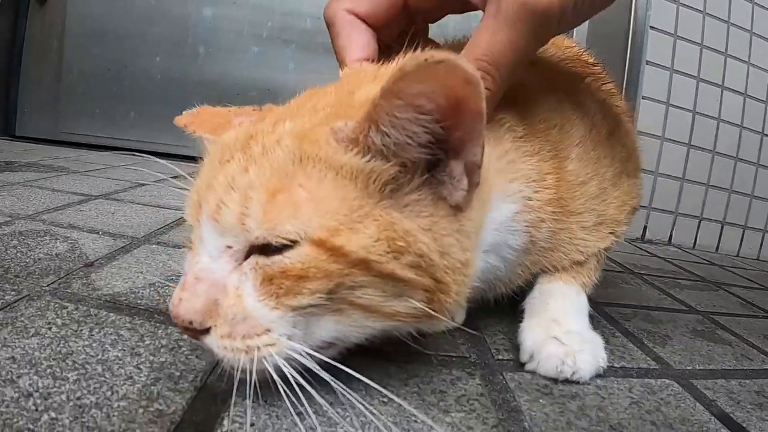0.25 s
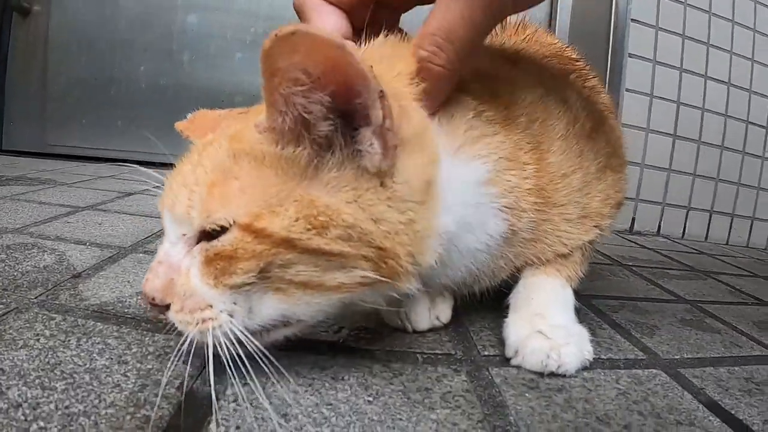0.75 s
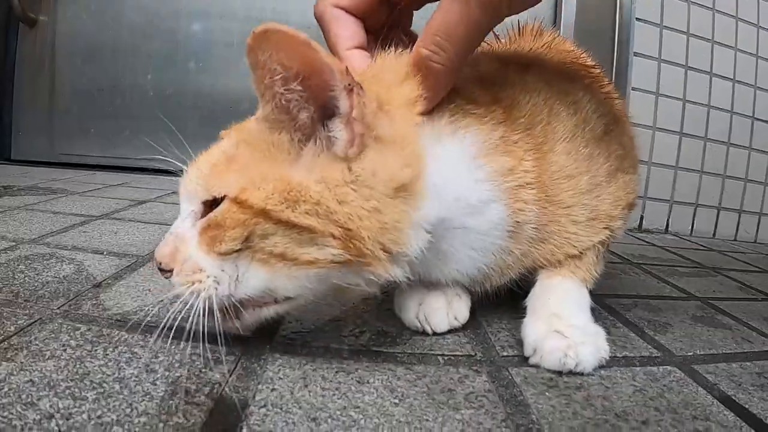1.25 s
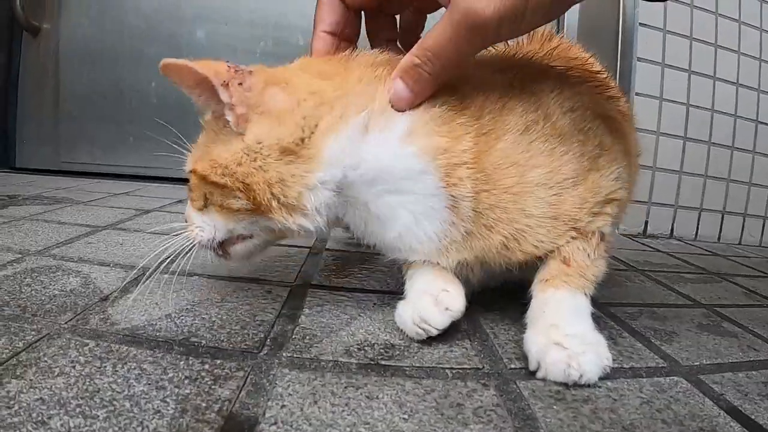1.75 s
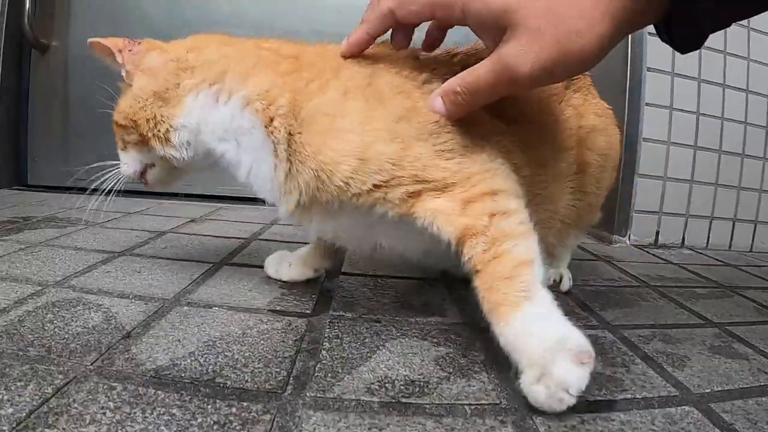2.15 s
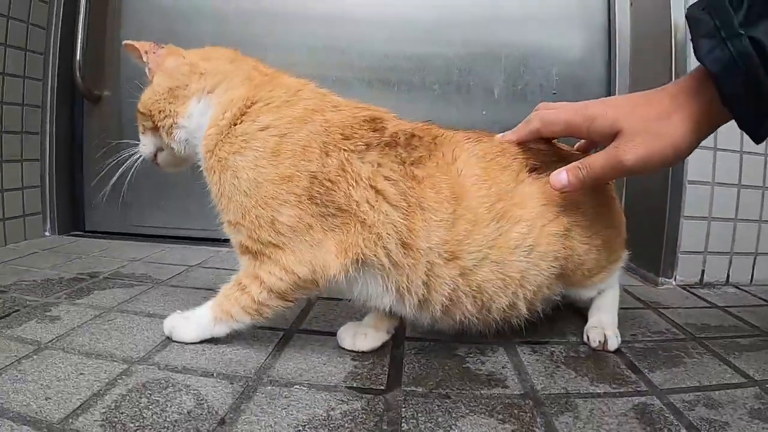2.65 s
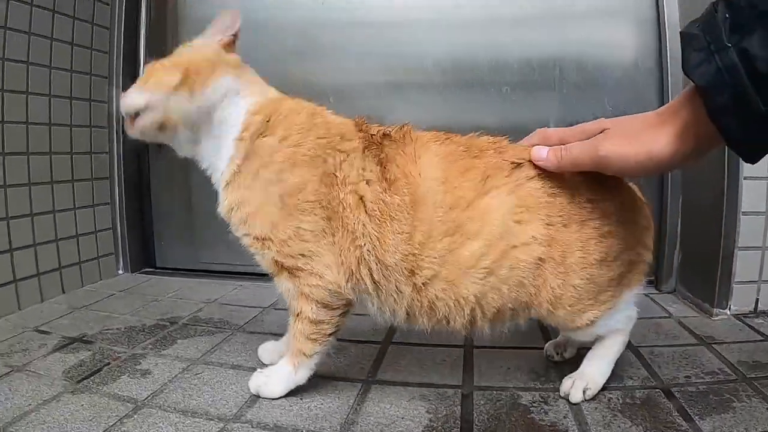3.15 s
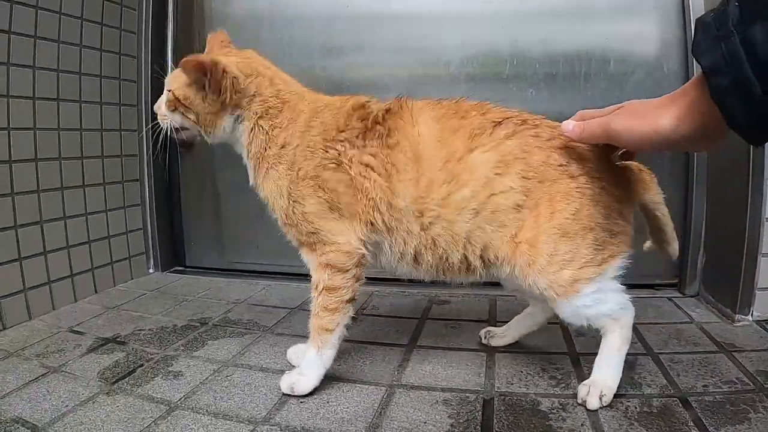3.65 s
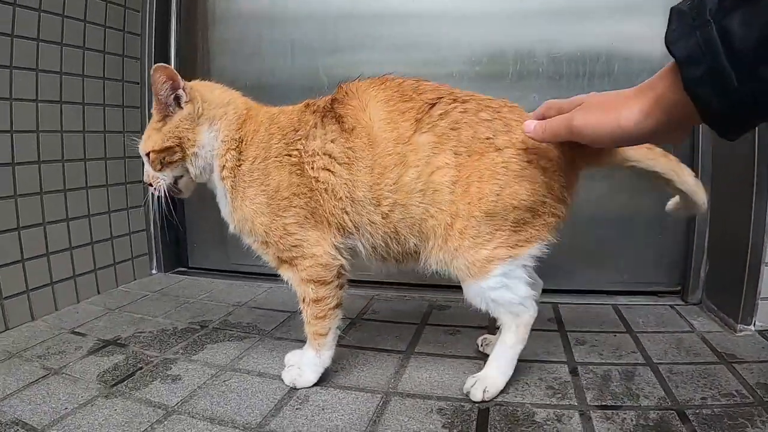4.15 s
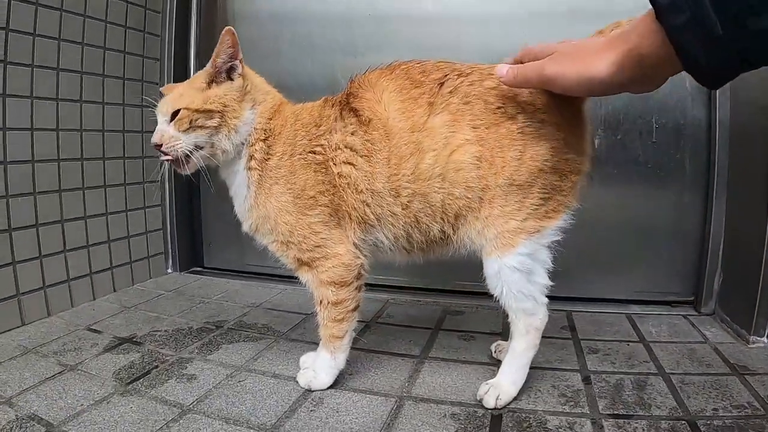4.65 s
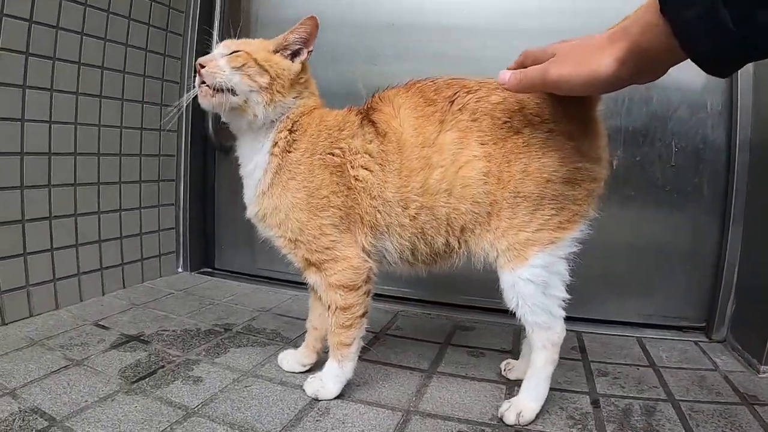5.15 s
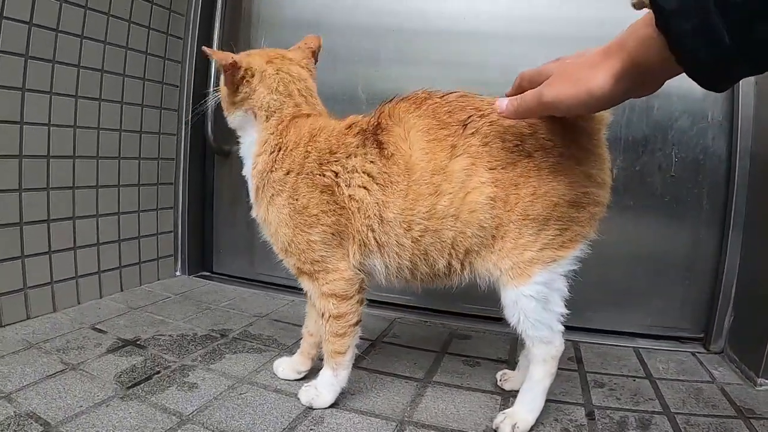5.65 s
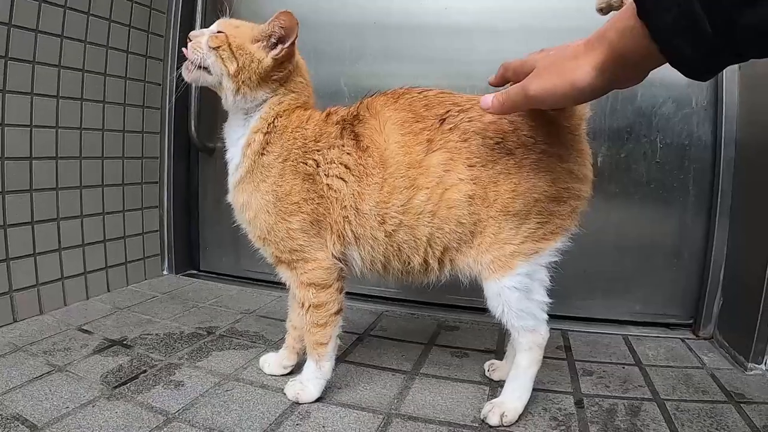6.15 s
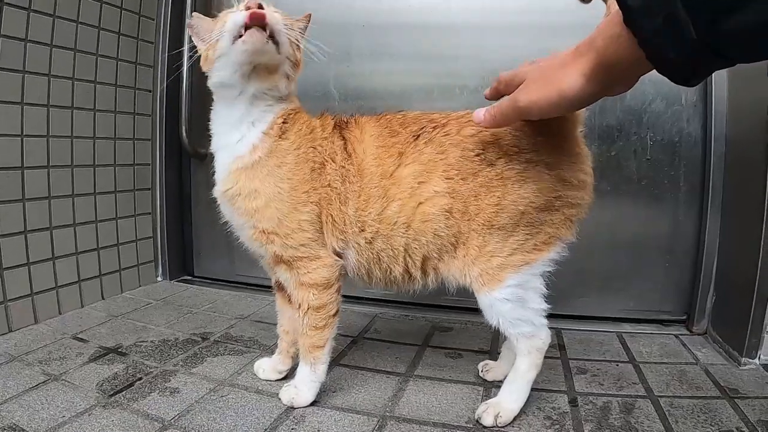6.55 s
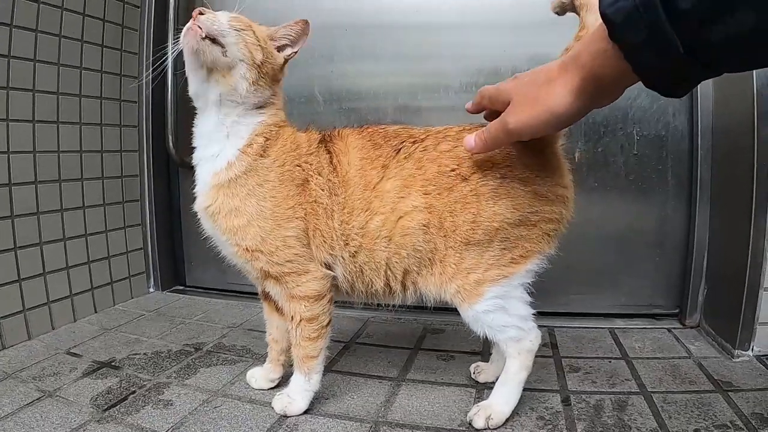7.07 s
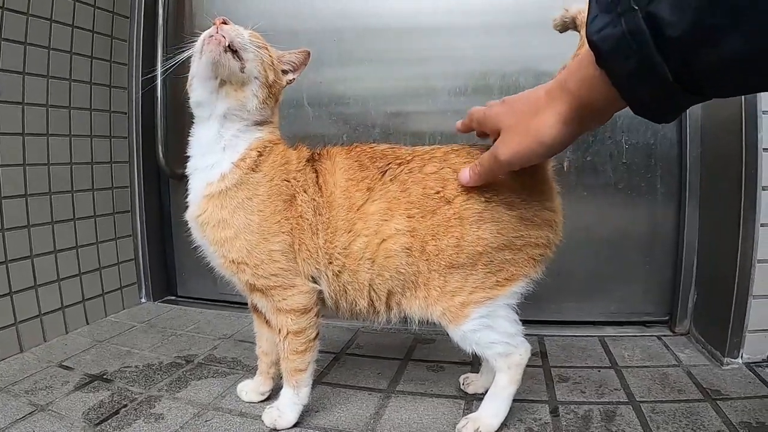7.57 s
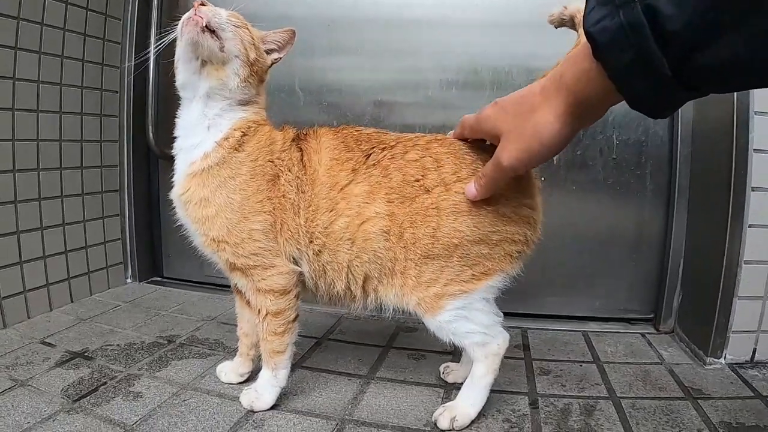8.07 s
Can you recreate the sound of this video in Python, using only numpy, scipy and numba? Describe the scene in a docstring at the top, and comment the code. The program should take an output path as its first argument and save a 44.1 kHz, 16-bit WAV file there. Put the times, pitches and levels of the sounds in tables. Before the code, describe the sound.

A cat gives three hoarse, squeaky high mews in a tiled porch, over steady rain and low town rumble, with soft bumps and clicks.

```python
"""A cat with a hoarse, squeaky voice mews three times in a tiled porch: wavering harmonic lines with
half-multiples, roughened by a rasp and mixed with air noise. Rain falls outside as coloured noise with single
ringing drops, over a deep town rumble of low noise. Jacket sleeve and fur rustle as short band noise, the
small camera takes soft bumps, and drips and claws click on the tiles, both as damped modes."""
import sys
import numpy as np
from scipy import signal
from scipy.fft import rfft, irfft
from scipy.io import wavfile
from scipy.ndimage import uniform_filter1d
from numba import njit

SR = 44100
rng = np.random.default_rng(int(sys.argv[2]) if len(sys.argv) > 2 else 0)


def generate_wav(sig):
    """Save sig (samples, or channels by samples) to the path in sys.argv[1] as 16-bit PCM at SR."""
    pcm = np.round(np.clip(np.atleast_2d(sig).T, -1, 1) * 32767).astype(np.int16)
    wavfile.write(sys.argv[1], SR, pcm)


N = 366471
T = np.arange(N) / SR  # s
F = np.maximum(np.arange(N // 2 + 1) * SR / N, 1)  # Hz, one per FFT bin


def undb(db):
    """Logarithmic level: amplitude gain of a level in dB."""
    return 10 ** (np.asarray(db) / 20)


def unit(x):
    """Normalisation: scaled to rms 1."""
    return x / np.sqrt(np.mean(x ** 2))


def on_axis(table):
    """Spectral interpolation: a (Hz, value) table read at every FFT bin, straight on log frequency."""
    hz, value = np.transpose(table)
    return np.interp(np.log(F), np.log(hz), value)


def pan(x, db):
    """Level difference between channels: the left is db above the right."""
    return x * undb(np.array([[db / 2], [-db / 2]]))


def walk(rate, count=N):
    """Random modulation: levels held for 1 / rate s and slewed twice; spread near 1."""
    hold = max(int(SR / rate), 1)
    steps = np.repeat(rng.standard_normal(count // hold + 1), hold)
    return 1.313 * uniform_filter1d(uniform_filter1d(steps, hold), hold)[:count]


@njit
def moving_bandpass(x, hz, width):
    """Resonance: a state-variable band-pass with a moving centre, gain 1 there."""
    y, band_state, low_state = np.empty(len(x)), 0., 0.
    for i in range(len(x)):
        g, damping = np.tan(np.pi * hz[i] / SR), width / hz[i]
        v = (band_state + g * (x[i] - low_state)) / (1 + g * (g + damping))
        band_state = 2 * v - band_state
        low_state += 2 * g * v
        y[i] = damping * v
    return y


def band(x, hz, width):
    """Cascaded resonance: passed twice, steep on both sides; rms 1."""
    centre = hz + 0 * x
    once = moving_bandpass(x, centre, 1. * width)
    return unit(moving_bandpass(once, centre, 1. * width))


@njit
def rings(start, hz, t60, left, right):
    """Free vibration: a damped sine for each blow, cut off after falling 60 dB."""
    out = np.zeros((2, N))
    for k in range(len(start)):
        step = np.exp(2j * np.pi * hz[k] / SR - np.log(1000) / (t60[k] * SR))
        z = 1 + 0j
        for i in range(int(start[k] * SR), min(N, int((start[k] + t60[k]) * SR))):
            out[0, i] += left[k] * z.imag
            out[1, i] += right[k] * z.imag
            z *= step
    return out


# Stereo width of the weather. Each row: frequency in Hz, side minus mid level in dB.
SIDE_LEVEL = [(60, -22), (110, -16.5), (170, -14), (300, -14), (1240, -5), (4180, -2.5), (9000, -1)]
# Level difference of the two ports. Each row: frequency in Hz, left minus right in dB.
PORT_LEAN = [(300, 0.55), (680, 1), (1240, 4), (4180, 5), (8000, 0)]
# Phase difference of the two ports. Each row: frequency in Hz, phase by which the left leads in radians.
PORT_PHASE = [(300, 0), (1200, -.5), (3000, -1), (5000, 1.5), (7000, 2), (9000, 3.5)]


def wash(spectrum, swell_db, flicker_db):
    """Diffuse field: stereo noise in half-octave bands that swell together and flicker alone."""
    shape = undb(on_axis(spectrum)) * (F < spectrum[-1][0])
    swell = walk(0.62)
    mid, side = rfft(rng.standard_normal((2, N)))
    side = side * undb(on_axis(SIDE_LEVEL))
    lean = undb(on_axis(PORT_LEAN) / 2) * np.exp(.5j * on_axis(PORT_PHASE))
    pair = shape * np.array([(mid + side) * lean, (mid - side) / lean])
    octave = np.log2(F)
    lowest, highest = np.log2(spectrum[0][0]), np.log2(spectrum[-1][0])
    out = 0
    for centre in np.arange(np.floor(lowest), highest + .5, .5):
        slot = np.clip(1 - 2 * np.abs(octave - centre), 0, 1)  # neighbours overlap and sum to 1
        out = out + undb(swell_db * swell + flicker_db * walk(9)) * irfft(pair * slot, N)
    return unit(out)


# Colour of the town rumble. Each row: frequency in Hz, relative density in dB per Hz.
RUMBLE_COLOUR = [(8.8, -48), (15, -16), (25, -9), (33, 1.5), (48, 1), (103, -16.5), (135, -28.5),
                 (174, -21), (196, -29.5), (222, -24), (248, -32), (280, -27), (320, -35.5), (368, -41.5),
                 (400, -36), (520, -55), (880, -120)]
# Chance level fluctuations of the low noise, below about 130 Hz.
# Each row: middle in seconds, level change in dB.
NOISE_LEVEL_MARKS = [(0, -4.5), (1.81, -8.5), (3.555, -6), (4.12, -6.5), (4.47, 5), (5.13, -11),
                     (6.69, -11), (8.2, -4.5)]
RUMBLE_DB = -26.5
MARK_S, MARK_TOP_HZ = 0.051, 130  # the fluctuations touch only the deepest part


def rumble():
    """Low-pass noise: a deep town rumble whose bottom fluctuates by chance."""
    steady = wash(RUMBLE_COLOUR, swell_db=0.51, flicker_db=2.65)
    level = undb(sum(db * np.exp(-((T - s) / MARK_S) ** 2) for s, db in NOISE_LEVEL_MARKS))
    deep = irfft(rfft(steady) / (1 + (F / MARK_TOP_HZ) ** 4), N)
    return undb(RUMBLE_DB) * (steady + (level - 1) * deep)


# Colour of the rain. Each row: frequency in Hz, relative density in dB per Hz.
RAIN_COLOUR = [(150, -33), (260, -5.5), (400, -12.5), (530, -10.5), (800, -15.5), (1050, -10.5),
               (2000, -13), (5400, -18), (6800, -21), (8500, -31.5), (12400, -43.5), (14500, -56)]
DROPS_PER_S, DROP_SCATTER_DB = 400, 3
DROP_DB = -11.5  # against the hiss of the rain
RAIN_DB, RAIN_DB_PER_S = -42.5, -0.2  # it eases slowly


def drops():
    """Random impacts: single drops ring briefly, scattered in pitch, size and side."""
    when, pitch, rarity, side = rng.random((int(DROPS_PER_S * N / SR), 4)).T
    hz = 700 * 2 ** (3.8 * pitch)
    size = undb(-DROP_SCATTER_DB * np.log(1 - .998 * rarity))  # few are large
    patter = rings(when * N / SR, hz, 12.5 / hz, size * np.sqrt(side), size * np.sqrt(1 - side))
    white = rfft(patter) * np.sqrt(F)  # small drops as loud per Hz as large ones before colouring
    return unit(irfft(white * undb(on_axis(RAIN_COLOUR)), N))


def rain():
    """Superposition: innumerable drops merge into nearly steady noise, with single ones standing out."""
    hiss = wash(RAIN_COLOUR, swell_db=.3, flicker_db=1.6)
    return undb(RAIN_DB + RAIN_DB_PER_S * T) * (hiss + undb(DROP_DB) * drops())


def sounding(table):
    """Piecewise interpolation: the samples a table spans, its columns there, and a soft-ended gate."""
    s, *columns = np.transpose(table)
    span = slice(int(s[0] * SR), int(s[-1] * SR))
    t = T[span]
    gate = np.clip(np.minimum(t - s[0], s[-1] - t) / 0.022, 0, 1)
    return span, [np.interp(t, s, c) for c in columns], gate


RASP_HZ = 259  # mean; it wanders


def whistle(hz, lines, rough):
    """Amplitude modulation: a rasp splits the fluttering multiples of one wavering pitch into strands."""
    n = len(hz)
    waver = 1 + .005 * walk(60, n) + 0.0361 * rough * walk(500, n)
    phase = 2 * np.pi * np.cumsum(hz * waver) / SR
    rasp = 2 * np.pi * np.cumsum(RASP_HZ * (1 + .25 * walk(25, n))) / SR
    split = 1 + 1.24 * rough * np.sin(rasp)
    total = 0
    for multiple, db in lines:
        flutter_db = (2.5 + 1.4 * rough) * walk(89.94, n) + 1.8 * rough * walk(400, n)
        total = total + undb(db + flutter_db) * np.sin(multiple * phase)
    return np.sqrt(2) * split * total


# Thinner strands beside the squeak: mostly another part of the folds whistling on its own, but near 4300-4400
# Hz # in the last mew a fixed resonance that flares as the line passes. # Each row: start in seconds, length in
# seconds, first pitch in Hz, last pitch in Hz, top level in dB.
SIDE_STRANDS = [(0.619, 0.095, 5040, 5200, -49), (0.725, 0.125, 5270, 5230, -44),
                (0.683, 0.16, 1038, 1073, -55), (1.63, 0.06, 5150, 5700, -52), (1.67, .12, 5950, 6360, -50),
                (1.675, 0.11, 4330, 4680, -46), (1.829, 0.088, 4590, 4650, -36.5),
                (1.88, 0.12, 5300, 5340, -46.5), (1.983, 0.15, 5330, 5100, -43.5),
                (2.13, 0.26, 4950, 4950, -50.5), (1.962, 0.19, 3924, 3950, -50),
                (2.77, .09, 2660, 2450, -53), (2.772, 0.073, 4450, 4480, -51),
                (2.765, 0.08, 5080, 5000, -53), (5.299, 0.062, 5520, 5550, -50),
                (5.42, .07, 5200, 5050, -53), (5.781, 0.081, 4350, 4300, -35),
                (6.106, 0.05, 4340, 4296, -48), (6.219, 0.066, 4300, 4395, -40),
                (6.345, 0.1, 4400, 4370, -46)]
STRAND_ENDS_DB, STRAND_ROUGH = -5, 0.34  # a strand swells to its middle


def strands():
    """Independent oscillators and a flaring resonance: thin whistles glide straight beside the main squeak."""
    out = np.zeros(N)
    for s, length, first_hz, last_hz, db in SIDE_STRANDS:
        span, (hz, along), gate = sounding([(s, first_hz, -1), (s + length, last_hz, 1)])
        lines = [(1, db + STRAND_ENDS_DB * along ** 2)]
        out[span] += gate * whistle(hz, lines, STRAND_ROUGH)
    return out


# Pitch and level of the squeaks, one curve a squeak; the first mew breaks into two.
# Each row of a curve: time in seconds, pitch in Hz, level of the main line in dB.
SQUEAKS = [
    [(0.39, 3000, -56), (0.405, 3210, -47), (0.425, 3460, -36.5), (0.44, 3517, -31.5), (0.47, 3490, -44),
     (0.486, 3536, -33), (0.52, 3535, -34), (0.535, 3565, -40), (0.605, 3530, -48), (0.63, 3500, -54),
     (0.66, 3450, -62)],
    [(0.54, 3700, -47), (0.6, 3810, -46), (0.615, 3930, -46), (0.665, 4025, -42), (0.7, 4070, -53),
     (0.77, 4090, -52), (0.84, 4070, -55), (0.89, 4000, -62)],
    [(1.63, 3560, -63), (1.665, 3660, -46), (1.71, 4000, -45), (1.74, 4260, -38), (1.77, 4310, -47),
     (1.8, 4340, -37), (1.84, 4420, -44), (1.88, 4420, -52), (1.92, 4455, -41), (1.98, 4520, -47),
     (2.04, 4400, -41), (2.065, 4260, -51), (2.08, 4300, -39.5), (2.245, 4184, -39.5), (2.265, 4220, -55),
     (2.31, 4100, -28.5), (2.34, 4126, -43), (2.36, 4150, -42), (2.37, 4140, -35), (2.388, 4170, -41),
     (2.397, 4094, -32), (2.46, 3940, -33), (2.49, 4090, -35.5), (2.558, 4000, -34.5), (2.575, 4040, -50),
     (2.585, 3900, -31.5), (2.62, 3684, -32), (2.688, 3360, -40.5), (2.72, 3346, -34), (2.752, 3710, -40),
     (2.765, 3863, -32.5), (2.79, 3930, -36.5), (2.82, 3874, -43), (2.84, 3760, -36.5), (2.9, 3880, -56),
     (2.95, 3880, -60)],
    [(5.18, 4200, -65), (5.21, 4260, -50), (5.27, 4270, -40), (5.3, 4540, -43), (5.352, 4540, -38),
     (5.415, 4390, -50), (5.435, 4524, -45), (5.49, 4370, -43), (5.52, 4220, -31.5), (5.535, 4260, -40),
     (5.565, 4057, -37), (5.65, 4193, -40), (5.71, 4335, -37.5), (5.74, 4534, -41), (5.755, 4680, -43),
     (5.79, 4346, -34.5), (5.83, 4110, -33), (5.865, 3820, -31), (5.898, 3726, -30), (5.925, 3770, -45),
     (5.94, 4020, -31), (5.976, 4280, -33.5), (6.02, 4630, -41), (6.055, 4830, -40), (6.08, 5020, -41),
     (6.098, 4880, -39), (6.12, 4400, -38), (6.135, 4300, -34), (6.185, 3812, -37.5), (6.245, 4070, -39.5),
     (6.275, 4374, -46), (6.3, 4430, -39), (6.32, 4600, -41), (6.345, 4640, -41), (6.376, 4240, -35),
     (6.4, 3730, -36), (6.43, 3440, -44), (6.46, 3390, -62)],
]
# Voice of each squeak at the middle pitch and level. Each row: half line in dB, 3/2 line in dB, octave in dB,
# extra octave at the start in dB, hiss in dB, hiss drift in dB per s, roughness 0-1, extra roughness at start.
SQUEAK_VOICES = [(-62, -78, -69, 24.5, -63, .1, 0.22, .01), (-55, -72, -80, -2, -48, .1, 0.8, -.8),
                 (-60, -67, -73, 7, -51.5, 2.5, 0.1, .65), (-64, -59, -71, 2, -46.5, -6, 0.17, 0.15)]
# Fixed colour of the hiss in the throat. Each row: centre in Hz, width in Hz, level in dB.
THROAT_BANDS = [(2800, 900, -5), (3600, 600, -5), (4500, 800, -2), (5100, 1000, -1.5)]
MIDDLE_HZ, MIDDLE_DB = 4000, -40
GLIDE_S = 0.0037  # the pitch turns smoothly
# tighter folds: more half line, hiss and roughness, less overtone
HALF_DB_PER_KHZ, THREE_HALVES_DB_PER_KHZ, OCTAVE_DB_PER_KHZ = 24, -28, -36
HISS_DB_PER_KHZ, ROUGH_PER_KHZ = 24, .28
# pitch against the middle where the half line and hiss stop growing (upward) and the overtones (downward)
HALF_FULL_KHZ, HISS_FULL_KHZ, OVERTONES_FULL_KHZ = .2, .03, -.29
# how they go with the level of the squeak
HALF_FOLLOWS, LINES_FOLLOW, HISS_FOLLOWS, ROUGH_PER_DB = .3, 0.68, 0.074, 0.002
OVERTONE_STEP_DB = -19.5  # fall per multiple above the octave
BRIGHT_START_S, ROUGH_START_S = 0.063, 0.18  # time constants of the extras at the start
DULL_END_DB, DULL_END_S = -25, .05  # the overtones die first
PATCHY_DB = 1.5  # the half line comes and goes
HISS_SWELL_S = 0.051  # the air leak grows after the squeak begins
NEAR_HISS_DB, NEAR_HISS_HZ = -4, 790  # level and width of the hiss that hugs the line
CAT_PAN_DB = 2.5


def cat():
    """Self-oscillation: tight folds squeak with half-multiples and overtones; leaking air hisses round them."""
    out = np.zeros(N)
    air = rng.standard_normal(N) * undb(3.0 * walk(200))
    throat = sum(undb(db) * band(air, hz, width) for hz, width, db in THROAT_BANDS)
    for curve, voice in zip(SQUEAKS, SQUEAK_VOICES):
        half_db, three_halves_db, octave_db, start_db, hiss_db, drift_db, rough, start_rough = voice
        span, (hz, db), gate = sounding(curve)
        hz = uniform_filter1d(hz, int(GLIDE_S * SR))
        since = T[span] - curve[0][0]
        khz, effort = (hz - MIDDLE_HZ) / 1e3, db - MIDDLE_DB

        half_db = half_db + HALF_DB_PER_KHZ * np.minimum(khz, HALF_FULL_KHZ)
        half_db = half_db + HALF_FOLLOWS * effort + PATCHY_DB * walk(20.1, len(hz))
        tight = np.maximum(khz, OVERTONES_FULL_KHZ)
        follow = LINES_FOLLOW * effort + DULL_END_DB * np.exp((since - since[-1]) / DULL_END_S)
        three_halves_db = three_halves_db + THREE_HALVES_DB_PER_KHZ * tight + follow
        octave_db = octave_db + OCTAVE_DB_PER_KHZ * tight + follow
        octave_db = octave_db + start_db * np.exp(-since / BRIGHT_START_S)
        lines = [(.5, half_db), (1, db), (1.5, three_halves_db), (2, octave_db),
                 (3, octave_db + OVERTONE_STEP_DB), (4, octave_db + 2 * OVERTONE_STEP_DB)]

        rough = rough + ROUGH_PER_KHZ * khz + ROUGH_PER_DB * effort
        rough = rough + start_rough * np.exp(-since / ROUGH_START_S)
        squeak = whistle(hz, lines, np.clip(rough, .05, 1))

        hiss_db = hiss_db + drift_db * since + HISS_FOLLOWS * effort
        hiss_db = hiss_db + HISS_DB_PER_KHZ * np.minimum(khz, HISS_FULL_KHZ)
        leak = undb(hiss_db) * (1 - np.exp(-since / HISS_SWELL_S))
        near = undb(NEAR_HISS_DB) * band(air[span], hz, NEAR_HISS_HZ)
        out[span] += gate * (squeak + leak * (near + throat[span]))
    return pan(out + strands(), CAT_PAN_DB)


# Sleeve and fur rustles. Each row: start in seconds, length in seconds, centre in Hz, level in dB.
CLOTH_RUSTLES = [(.68, 0.23, 1110, -47), (1.72, 0.08, 1130, -47.5), (7.173, .03, 12000, -61),
                 (7.25, 0.12, 2940, -52), (7.758, 0.1, 4340, -49)]
# Brief swells of the low rumble. Each row: start in seconds, length in seconds, centre in Hz, level in dB.
RUMBLE_SURGES = [(5.17, .2, 388, -50), (5.27, .12, 251, -46), (7.27, 0.11, 226, -45),
                 (7.72, .12, 172, -37.5), (7.74, 0.17, 228, -41.5)]
RUSTLE_WIDTH, SURGE_WIDTH = 0.5, 0.22  # share of the centre


def noise_swells(table, width):
    """Band-limited noise: grainy bursts, for rustles or surges, that swell and fade along half a sine."""
    out = 0
    for s, length, hz, db in table:
        swell = np.sin(np.pi * np.clip((T - s) / length, 0, 1))
        grains = rng.standard_normal(N) * undb(4.0 * walk(300))
        out = out + undb(db) * swell * band(grains, hz, width * hz)
    return pan(out, 1.0)


# Soft bumps on the camera body. Each row: start in seconds, level of the ring in dB, ring in Hz,
# t60 in seconds, level in dB of the rocking that the two ports feel in opposite sense.
BODY_BUMPS = [(0.865, -28.5, 118, 0.064, -55), (2.963, -21, 328, 0.027, -48), (3.62, -34.5, 214, 0.15, -50),
              (5.525, -21.5, 180, 0.09, -19), (6.613, -36, 120, 0.064, -55), (8.143, -36, 186, 0.086, -46)]
ROCK_HZ, ROCK_T60_S = 135, 0.19


def bumps():
    """Modal vibration: the body rings low and dull in three modes and rocks in opposite sense."""
    s, db, hz, t60, rock_db = np.transpose(BODY_BUMPS)
    thud = rings(s, hz, t60, undb(db - 0.5), undb(db))
    thud = thud + rings(s, 1.87 * hz, 0.72 * t60, undb(db - 9), undb(db - 7.5))
    thud = thud + rings(s, 2.67 * hz, 0.29 * t60, undb(db - 11.5), undb(db - 4.0))
    thud = thud + rings(s, ROCK_HZ + 0 * s, ROCK_T60_S + 0 * s, -undb(rock_db), undb(rock_db))
    return uniform_filter1d(thud, size=25)  # a soft push


# Drips and claws on tile. Each row: start in seconds, relative level in dB, ring in Hz,
# crack against the ring in dB (before CRACK_DB).
TILE_CLICKS = [(2.963, -26.5, 1124, -4), (2.965, -25, 1045, -8), (2.968, -25, 1100, -10),
               (2.975, -29, 1400, -14), (2.989, -33, 2210, -12), (2.987, -32, 1150, -16),
               (3.0, -33, 1520, -16), (3.009, -30, 1220, -14), (3.014, -34, 1100, -16),
               (3.128, -36, 1370, -6), (3.342, -30, 1250, -16), (3.348, -35, 1950, -16),
               (3.619, -35, 2500, -20), (3.6212, -19, 1330, -28), (3.689, -29, 2560, -16),
               (3.751, -38, 1900, -5), (3.809, -29, 2100, -8), (4.703, -33, 1730, -14),
               (6.462, -34, 1080, -11)]
# Modes of a click. Each row: multiple of the ring, level in dB.
TILE_MODES = [(1, 7), (1.25, 1), (2.05, -4)]
CLICK_T60_S, CLICK_RISE_S = 0.011, .004  # the ring builds up before it decays
CRACK_DB = 3  # added to every crack


def clicks():
    """Impact excitation: modes of tile ring briefly after a broad crack of noise."""
    s, db, hz, crack_db = np.transpose(TILE_CLICKS)
    gain, crack = undb(db), undb(db + crack_db + CRACK_DB)
    ring = 0
    for multiple, mode_db in TILE_MODES:
        decay = rings(s, multiple * hz, CLICK_T60_S + 0 * s, gain, gain)
        rise = rings(s, multiple * hz, CLICK_RISE_S + 0 * s, gain, gain)
        ring = ring + undb(mode_db) * (decay - rise)
    ring = uniform_filter1d(ring, size=7)  # the contact lasts a moment, which rounds the attack
    ring = ring - uniform_filter1d(ring, size=41)  # small things radiate no bass
    envelope = rings(s, 150 + 0 * s, 0.02 + 0 * s, crack, crack)
    burst = envelope * band(rng.standard_normal(N), 5000, 4060)
    return pan(ring + burst, 2.3)


PORCH_T60_S = 0.26
PORCH_DB, CAT_PORCH_DB = -3, -0.7  # clicks and rustles are nearer and drier than the cat


def porch(x, db):
    """Reverberation: tiled walls return a dense short tail, unlike at the two ports."""
    t = np.arange(int(.5 * SR)) / SR
    tail = rng.standard_normal((2, len(t))) * undb(-60 * t / PORCH_T60_S) * (t > .004)
    tail = tail / np.sqrt(np.sum(tail ** 2, axis=1, keepdims=True))
    # direct sound lags at the left port in the middle range only
    lead = np.exp(.5j * np.minimum(on_axis(PORT_PHASE), 0))
    direct = irfft(rfft(x) * [lead, 1 / lead], N)
    return direct + undb(db) * signal.fftconvolve(x, tail, axes=1)[:, :N]


def scene():
    """Superposition: near sounds pass through the porch; the weather arrives already diffuse."""
    weather = rumble() + noise_swells(RUMBLE_SURGES, SURGE_WIDTH) + rain()
    mews = porch(cat(), CAT_PORCH_DB)
    near = porch(noise_swells(CLOTH_RUSTLES, RUSTLE_WIDTH) + clicks(), PORCH_DB)
    return weather + mews + near + bumps()


TOP_HZ = 14400


def record(dry):
    """Band limiting: the camera cuts the top with a steep elliptic low-pass."""
    return signal.sosfilt(signal.ellip(8, .2, 70, TOP_HZ, fs=SR, output="sos"), dry)


dry = scene()
out = record(dry)
generate_wav(out)
```